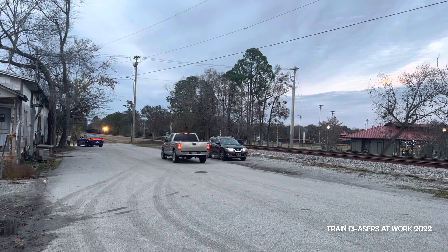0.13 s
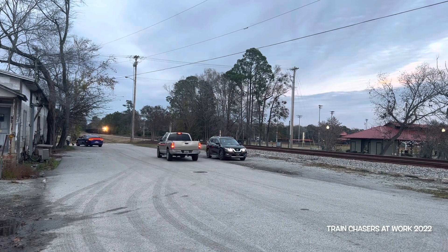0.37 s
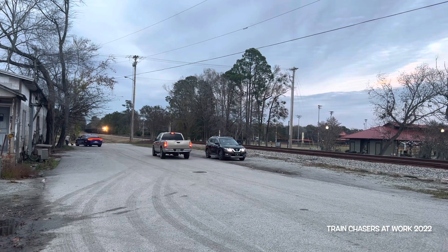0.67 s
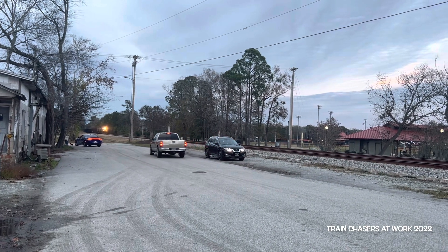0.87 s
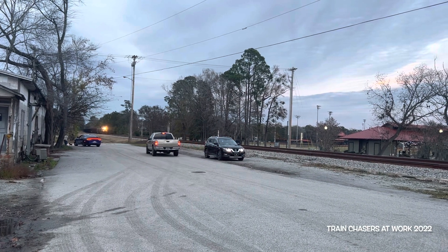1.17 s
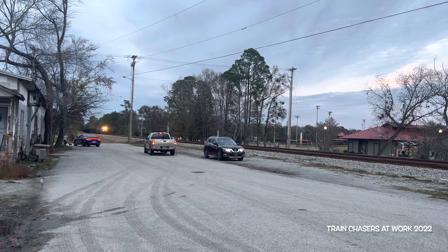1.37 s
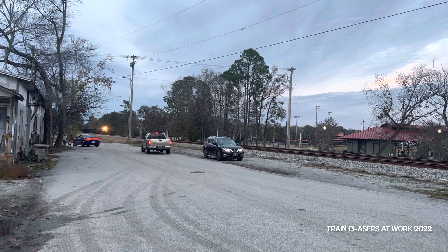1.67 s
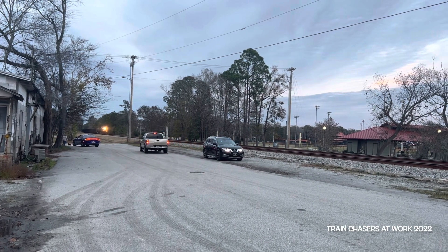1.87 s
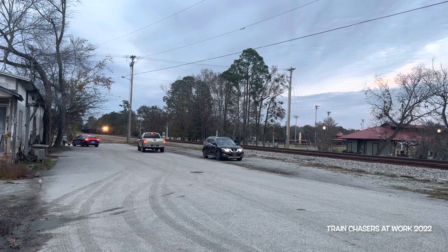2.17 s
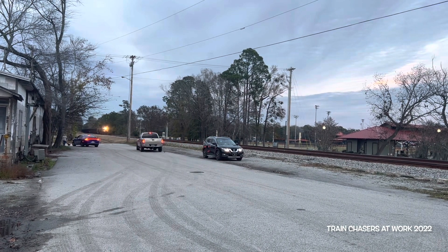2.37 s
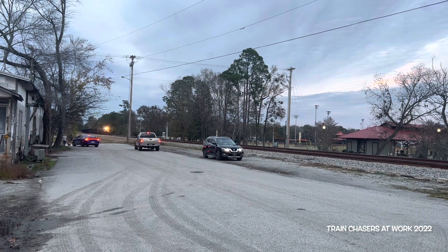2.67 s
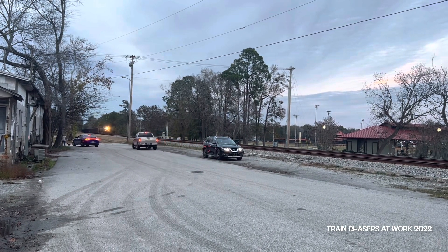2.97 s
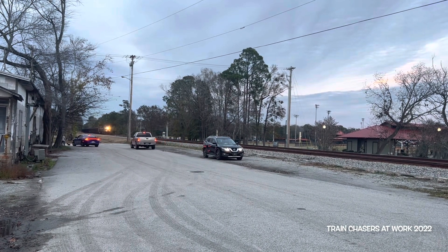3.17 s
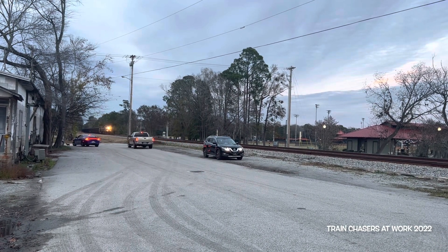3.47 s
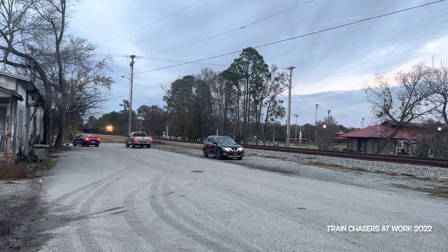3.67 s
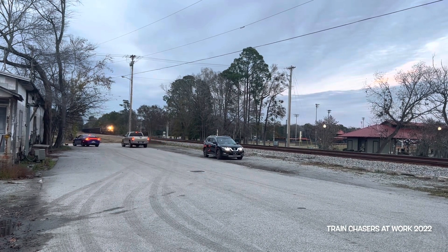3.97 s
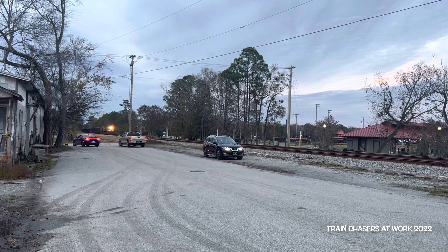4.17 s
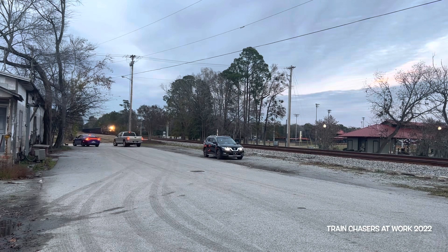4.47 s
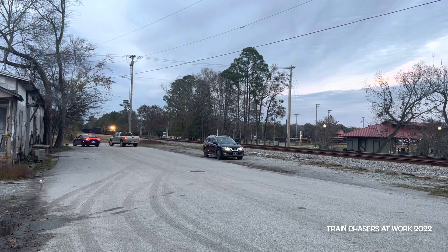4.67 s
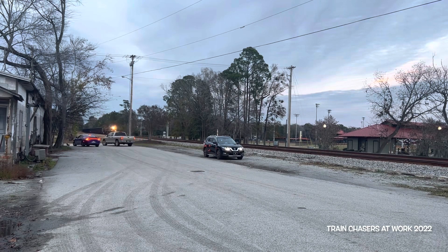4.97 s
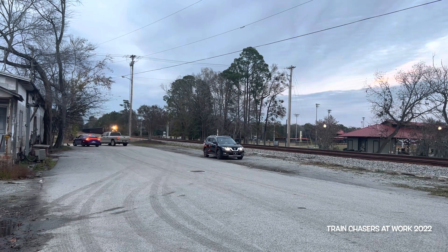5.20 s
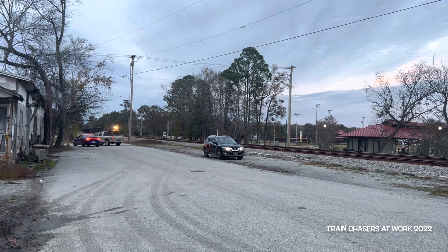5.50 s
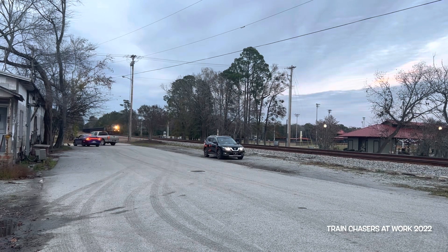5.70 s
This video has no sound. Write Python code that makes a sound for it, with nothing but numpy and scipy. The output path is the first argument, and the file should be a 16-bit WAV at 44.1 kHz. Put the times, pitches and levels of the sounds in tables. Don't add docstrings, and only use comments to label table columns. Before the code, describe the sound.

A train horn blows one long five-note chord at a distance, echoes flutter away, and a low diesel drone swells over rustle and grit ticks.

```python
import sys
import numpy as np
from scipy import signal
from scipy.io import wavfile
from scipy.ndimage import uniform_filter1d

SR = 44100
rng = np.random.default_rng(int(sys.argv[2]) if len(sys.argv) > 2 else 0)


def dump_mix(stems):
    frames = np.atleast_2d(stems).T
    limited = np.clip(frames, -1, 1)
    pcm = np.round(limited * 32767).astype(np.int16)
    wavfile.write(sys.argv[1], SR, pcm)


def ratio(d):
    e = np.asarray(d, float) / 20
    return 10 ** e


N = 257544
TIME = np.arange(N) / SR

# f/Hz, lead/rad
PORT_LEAD = [(70, .02), (100, .06), (190, .24), (430, .33), (800, .95), (1200, .65), (1800, 1.45),
             (2600, 2.2), (3500, 2.75), (4700, 4.2), (7500, 6.2), (9000, 5.6)]
# f/Hz, level/dB
PORT_LEAN = [(60, 0), (140, -2), (320, 0), (740, 0), (1130, 3), (2600, -0.5), (5000, 6), (9000, 0.5)]
# t/s, rumble level/dB
ENGINE_EFFORT = [(0, -29), (.6, -28.5), (1.5, -29.5), (2.1, -27), (2.7, -26), (3.3, -26.5), (3.9, -25.5),
                 (4.3, -25), (4.75, -25.5), (4.92, -25.5), (5.05, -22.5), (5.4, -22.5), (5.84, -21)]
ENGINE_MID_DB = -26
# speaks t/s, chokes t/s, how closely it follows line pressure [ratio]
SPEAKS = [
    (.203, 2.46, 0.7),
    (.205, 2.42, 0.86),
    (.203, 2.37, 1),
    (0.2, 2.41, 0.72),
    (0.18, 2.22, 2.4),
]
VALVE_OPENS_S = .2


def evened(x):
    return x / np.sqrt(np.mean(abs(x) ** 2) + 1e-20)


def read(points, hz):
    f, value = np.transpose(points)
    return np.interp(np.log(hz + 1), np.log(f + 1), value)


def curves(rows):
    s, *columns = np.transpose(rows)
    return [np.interp(TIME, s, c) for c in columns]


def drift(hz, size=64, count=N):
    r = np.exp(-2 * np.pi * hz * size / SR)
    steps = (N + SR) // size
    z = rng.standard_normal(steps) + 1j * rng.standard_normal(steps)
    for _ in range(2):
        z = signal.lfilter([1], [1, -r], z)
    z = z[SR // size - 2:]
    return np.interp(TIME[:count], np.arange(len(z)) * size / SR, evened(z))


def field(shape, bins, frames):
    parts = rng.standard_normal((2, *shape[::-1])).transpose(0, 2, 1)
    smooth = []
    for part in parts:
        across = uniform_filter1d(part, max(round(bins), 1), 0)
        smooth.append(uniform_filter1d(across, max(round(frames), 1), 1))
    return evened(smooth[0] + 1j * smooth[1])


def left_port(hz, lean):
    return ratio(read(lean, hz) / 2) * np.exp(.5j * read(PORT_LEAD, hz))


def at_ports(z, other, hz, size, shared=1):
    # f/Hz, coherence [0-1]
    port_same = [(60, .998), (140, .994), (300, .97), (520, .78), (900, .55), (1500, .4), (3000, .64),
                 (5500, .42), (8400, .92), (10000, .9)]
    same = np.clip(shared * read(port_same, hz), 0, 1)[:, None]
    half = left_port(hz, PORT_LEAN)[:, None]
    right = same * z + np.sqrt(1 - same ** 2) * other
    pair = np.array([z * half, right / half])
    return signal.istft(pair, nperseg=size, noverlap=size * 3 // 4)[1][:, :N]


def noise(colour, patchy_db, flicker_db, size):
    hz = np.fft.rfftfreq(size, 1 / SR)
    shape = (len(hz), 4 * N // size + 5)
    lumps_db = patchy_db * field(shape, 9, 9).real + flicker_db * rng.standard_normal(shape[1])
    gain = ratio(read(colour, hz)[:, None] + lumps_db)
    return evened(at_ports(gain * field(shape, 1, 1), gain * field(shape, 1, 1), hz, size))


def horn_air_db(speaks, chokes, follows):
    # t/s, level under full/dB
    pressure = [
        (.19, -13),
        (.206, -5.5),
        (.26, -4),
        (.36, -1),
        (.6, 0),
        (1.3, -0.5),
        (2.05, -1.5),
        (2.2, -1),
        (2.3, -5),
        (2.45, -14.5),
    ]
    speak_db_per_s, choke_db_per_s = 1500.5, 296.5
    gate_db = np.minimum(speak_db_per_s * (TIME - speaks), 0)
    gate_db -= choke_db_per_s * np.maximum(TIME - chokes, 0)
    follows = np.where(TIME < 1, min(follows, .8), follows)
    return follows * curves(pressure)[0], np.maximum(gate_db, -200)


def diesel():
    # f/Hz, share of rumble/dB, blur/Hz, wavering part [0-1]
    orders = [(69.3, -8, 4, .7), (96.5, -4.5, 5, .7), (138.6, -7, 3, .4), (173.2, -21, 2, .6),
              (207.9, -20, 3, .8), (233, -22, 3, .8), (46.2, -17, 3, .7), (250, -23, 3, .8),
              (287.5, -24, 3, .8), (325, -27, 3, .8)]
    # f/Hz, level/dB per Hz
    rumble_colour = [(12, -62.5), (24, -39.5), (34, -28.5), (46, -8), (70, -1.5), (100, -4.5), (120, 0),
                     (150, -9.5), (180, -36), (260, -59.5), (400, -120)]
    # f/Hz, level/dB per Hz
    roar_colour = [(90, -80), (130, -23), (170, -4.5), (240, -1.5), (300, -11), (360, -11.5), (420, -18),
                   (600, -38.5), (900, -51.5), (1500, -120)]
    orders_db, orders_db_per_s = -1.5, 0.1659
    roar_level_db, roar_follows = -35, 0.64
    rumble_db = curves(ENGINE_EFFORT)[0]
    out = ratio(-3) * noise(rumble_colour, 1.5, .5, size=2048)
    for hz, db, blur_hz, waver in orders:
        waver = np.clip(waver, 0, 1)
        wavering = np.sqrt(1 - waver ** 2) + waver * drift(blur_hz)
        line = np.sqrt(2) * np.exp(2j * np.pi * hz * TIME) * wavering
        half = left_port(hz, PORT_LEAN)
        lift_db = (orders_db + orders_db_per_s * TIME) * hz / orders[2][0]
        out += ratio(db + lift_db) * (line * np.array([[half], [1 / half]])).real
    roar_db = roar_level_db + roar_follows * (rumble_db - ENGINE_MID_DB)
    roar_db += 5 * np.exp(-TIME / .5)
    return ratio(rumble_db) * out + ratio(roar_db) * noise(roar_colour, 2.1, 0.35, size=1024)


def traffic():
    # f/Hz, level/dB per Hz
    hiss_colour = [(150, -63.5), (280, -11.5), (420, 0), (650, -2.5), (850, -5.5), (1100, -6.5),
                   (1400, -10.5), (2000, -11.5), (2450, -12.5), (2900, -13), (3400, -18), (4000, -26.5),
                   (6000, -53.5), (9000, -100)]
    # f/Hz, level/dB per Hz
    sizzle_colour = [(1500, -49.5), (3000, 2), (4000, 2.5), (5600, -3.5), (7000, -12.5), (8000, -18.5),
                     (10500, -33), (13000, -41.5), (16000, -71)]
    # f/Hz, level/dB per Hz
    truck_colour = [(290, -36.5), (500, -4.5), (591, -12), (627, -4.5), (708, 0), (1450, -5), (2140, -18.5),
                    (2270, -21), (3050, -24.5), (3960, -54.5), (6710, -120)]
    hum_db, wash_db, wash_lag_s = -44.5, -41.5, 0.19
    truck_db, truck_gone_s = -40, 0.39
    sizzle_start_db, sizzle_follows, sizzle_db_per_s = -63, .3, 0.76

    blowing = ratio(sum(horn_air_db(*SPEAKS[2]))) ** 2
    r = np.exp(-1 / (wash_lag_s * SR))
    power = ratio(2 * hum_db) + ratio(2 * wash_db) * signal.lfilter([1 - r], [1, -r], blowing)
    hum = np.sqrt(power) * noise(hiss_colour, 1.7, 0.91, size=512)

    effort_db = curves(ENGINE_EFFORT)[0] - ENGINE_MID_DB
    sizzle_db = sizzle_start_db + sizzle_db_per_s * TIME + sizzle_follows * effort_db
    sizzle = ratio(sizzle_db) * noise(sizzle_colour, 3.0, 0.99, size=512)

    leaving = ratio(truck_db) * np.exp(-.5 * TIME / truck_gone_s)
    return leaving * noise(truck_colour, 1.3, 0.83, size=512) + hum + sizzle


def rustle():
    # t/s, peak level/dB, dying time/s
    bursts = [(0, -70.5, 0.039), (.12, -69.5, 0.22), (.25, -66, 0.061), (.33, -72, 0.24), (.625, -67, 0.13),
              (1.255, -76.5, 0.28), (1.82, -70, 0.069), (2.055, -70.5, 0.094), (2.555, -75, 0.27),
              (2.925, -75, .05), (3.08, -86, .08), (3.25, -79, .08), (3.605, -75, 0.14), (3.8, -70, 0.78),
              (4.2, -71, 0.51), (4.7, -73.5, 0.37), (4.95, -70, .1), (5.1, -83, 0.41), (5.4, -75.5, 0.34),
              (5.65, -76.5, .4)]
    # f/Hz, level/dB per Hz
    cloth_colour = [(1500, -70), (3000, -28), (5000, -13), (6200, -10), (7400, -10), (8800, 0), (9800, -7),
                    (10800, -22), (12000, -28), (14000, -55)]
    floor_db, rise_s, fall_db = -87, .02, 11
    duck_db = -5.5
    level_db = floor_db + duck_db * ratio(sum(horn_air_db(*SPEAKS[0])))
    for s, peak_db, dies in bursts:
        away = np.maximum((s - TIME) / rise_s, (TIME - s) / max(dies, .01))
        level_db = np.maximum(level_db, peak_db - fall_db * away)
    crackle = ratio(2.6 * np.minimum(rng.exponential(1, N), 4))
    crackle = crackle * (rng.random(N) < 480 / SR)
    grain = .65 + evened(signal.lfilter([1], [1, -.985], crackle))
    return ratio(level_db) * evened(grain * noise(cloth_colour, 2.1, 1.6, size=256))


def strike(mix, s, peak_db, hz, width):
    t = np.arange(700) / SR
    scratch = .16 * rng.standard_normal((2, len(t))) * np.exp(-t / .002)
    click = np.arange(len(t)) == [[0], [2 * (hz < 7000)]]
    band = signal.butter(3, [hz - width / 2, hz + width / 2], "band", fs=SR, output="sos")
    ring = signal.sosfilt(band, scratch + click)
    mix[:, round(s * SR):][:, :len(t)] += ratio(peak_db) * ring / abs(ring.mean(0)).max()


def ticks():
    # t/s, peak level/dB, ring f/Hz, bright part under it/dB
    grit = [(.0842, -45, 4950, -18), (0.129, -53, 6030, -10), (0.1708, -53, 6000, 0),
            (0.204, -38, 4850, -14.5), (0.2402, -39, 4610, -11.5), (0.2546, -46, 3850, 0.5),
            (.3277, -43, 4980, -19.5), (0.3322, -56, 6040, 2), (0.368, -50.5, 5590, -8),
            (0.628, -57.5, 5900, -2), (.7193, -58, 6030, -1), (1.2411, -59, 5470, -2),
            (1.8162, -47, 6150, -13), (2.053, -35, 3300, -17), (2.5606, -58.5, 4800, 1),
            (2.7196, -48, 4500, -16), (2.9332, -48.5, 5800, -1.5), (3.0599, -39, 3260, -22),
            (3.2398, -34.5, 2700, -26), (3.2646, -55, 5980, -5), (3.615, -55, 6780, 4),
            (3.832, -61.5, 6000, 6), (3.8457, -48.5, 4940, -5), (3.9285, -45, 5420, -15),
            (4.0218, -43.5, 4900, -10), (4.11, -48, 5970, -10.5), (4.273, -44.5, 5120, -10),
            (4.9706, -57.5, 5500, -5.5), (5.2505, -53.5, 4930, -10), (5.4031, -54.5, 6020, -7.5)]
    # t/s, peak level/dB, top part under it/dB
    sparks = [(0.0573, -54, -29), (0.384, -61, -28.5), (0.622, -60, -31), (0.6444, -56.5, -33),
              (1.1488, -64.5, -29), (1.2524, -62.5, -13), (1.2585, -60, -17), (1.2685, -59.5, -24),
              (1.482, -63, -19), (1.4924, -69, -19), (1.8791, -59.5, -30), (2.9048, -63.5, -29),
              (3.236, -69, -19), (3.5783, -66, -29), (3.7569, -62, -33), (3.7898, -63, -31),
              (3.8243, -57, -41), (3.9644, -60, -51), (3.9747, -52, -46), (4.0944, -62, -39),
              (4.132, -60, -38), (4.3444, -61, -38), (4.5695, -60, -30), (4.6618, -60, -36),
              (5.2096, -67, -34), (5.5444, -63, -35)]
    # t/s, peak level/dB
    flecks = [(0.085, -76), (0.1705, -64.5), (0.2019, -73), (0.2385, -62), (0.3062, -77), (0.3311, -73),
              (0.367, -75.5), (0.618, -73.5), (1.1413, -83), (1.258, -69.5), (1.482, -75.5), (1.5055, -84),
              (1.7744, -77.5), (1.9979, -79), (2.053, -73.5), (2.0911, -77.5), (2.1246, -77), (2.5611, -76),
              (2.9342, -83), (3.0644, -84), (3.2645, -80), (3.6147, -79), (3.8591, -87), (3.926, -79),
              (4.0262, -79), (4.4877, -83), (4.6264, -89)]
    # t/s, peak level/dB, ring f/Hz
    knocks = [(.204, -32, 2000), (3.062, -44, 1690), (3.08, -31, 1100), (3.19, -38, 1500),
              (4.023, -36, 1600), (4.033, -34, 1210), (4.292, -36, 1150), (2.72, -34, 1100),
              (2.86, -36, 1300), (4.195, -41, 1100), (4.581, -46, 1370), (2.054, -34, 2200),
              (3.207, -33, 1000), (4.66, -47, 1150), (4.701, -45, 696), (4.714, -37, 1300),
              (4.74, -38, 1100)]
    # f/Hz, width/Hz
    bright = (8800, 1500)
    # f/Hz, width/Hz
    tick_top = (12800, 4500)
    # f/Hz, width/Hz
    spark_top = (11900, 1800)
    tick_top_db = -20.5
    out = np.zeros((2, N))
    for s, peak_db, hz, bright_db in grit:
        strike(out, s, peak_db, hz, .8 * hz)
        strike(out, s, peak_db + bright_db, *bright)
        strike(out, s, peak_db + bright_db + tick_top_db, *tick_top)
    for s, peak_db, top_db in sparks:
        strike(out, s, peak_db, *bright)
        strike(out, s, peak_db + top_db, *spark_top)
    for s, peak_db in flecks:
        strike(out, s, peak_db, *tick_top)
    for s, peak_db, hz in knocks:
        strike(out, s, peak_db, hz, 0.8 * hz)
    return out


def horn_turns(hz, sharp, bend):
    settles_s, valve_shuts_s, shutting_s = .13, 2.2, .2
    building = np.exp(-np.maximum(TIME - VALVE_OPENS_S, 0) / settles_s)
    closing = np.clip((TIME - valve_shuts_s) / shutting_s, 0, 1)
    pitch_hz = hz * (1 + sharp * building + bend * closing)
    return 2 * np.pi * (np.cumsum(pitch_hz) / SR + rng.random())


def shaken_air(hz, n):
    rough = (hz / 1000) ** 1.5
    each = np.array([drift(2 + hz / 300, count=n) for port in "LR"])
    shaken = 1 + min(.17 * rough, .75) * each + min(.13 * rough, .4) * drift(30, count=n)
    return shaken / np.sqrt(np.mean(abs(shaken) ** 2))


def chord():
    # steady f/Hz, sharp while pressure builds, bend as the valve shuts [shares of pitch]
    horns = [
        (323.9, .014, -.015),
        (379.3, .013, .01),
        (436.9, .017, .012),
        (506.8, .01, -.008),
        (633.6, .01, .004),
    ]
    heard_db = [(-26, -25, -32, -49, -57, -59, -63.5, -62, -74.5),
                (-25, -37.5, -44.5, -59.5, -49.5, -62.5, -71, -78.5, -79.5),
                (-20, -34.5, -45, -49, -58, -63.5, -72.5, -78.5, -81),
                (-28, -42.5, -54.5, -63, -62.5, -75, -79, -80.5, -88.5),
                (-23.5, -42.5, -53, -64, -64.5, -69.5, -75, -78, -95)]
    away_rows_db = [(-50, -45.5, -51.5, -61, -72.5, -61.5), (-52.5, -44.5, -53, -50.5, -52.5, -58.5),
                    (-50, -52, -56.5, -61, -79.5, -73.5), (-47, -46.5, -52, -54, -69.5, -69.5),
                    (-45.5, -67.5, -61, -63.5, -81, -76.5)]
    # f/Hz, level/dB
    horn_lean = [(60, -0.5), (91, -0.5), (140, -1.5), (210, -0.5), (320, 0.5), (490, -1.5), (740, -0.5),
                 (1130, 5.5), (1710, 0.5), (2600, 1)]
    rasp_top_hz, rasp_fall_db = 4850, 1.5
    brighten_opening, brighten_closing = 0.22, 0.49
    wander_db, wander_hz = 0.26, 6.4
    nearing_db_per_s = 1.5
    thrown_chokes_s, thrown_follows = 2.42, .8
    throw_follows, throw_dulls = 1.5, 0.4
    n = round(2.7 * SR)

    direct, thrown = np.zeros((2, N)), np.zeros(N)
    for horn, times, partials_db, thrown_db in zip(horns, SPEAKS, heard_db, away_rows_db):
        turns, pressure_db, gate_db = np.array([horn_turns(*horn), *horn_air_db(*times)])[:, :n]
        away_air = horn_air_db(times[0], thrown_chokes_s, thrown_follows)
        away_db, away_gate_db = np.array(away_air)[:, :n]
        above = np.arange(1, max(int(rasp_top_hz / horn[0]) - len(partials_db), 0) + 1)
        partials_db = (*partials_db, *(partials_db[-1] - rasp_fall_db * above))
        thrown_db = (*thrown_db, *(thrown_db[-1] - 3.1 * np.arange(1, len(partials_db))))
        brighten = np.where(TIME[:n] < 1, brighten_opening, brighten_closing)
        for k, (db, back_db) in enumerate(zip(partials_db, thrown_db), 1):
            hz = k * horn[0]
            level_db = db + (1 + brighten * (k - 1)) * pressure_db
            level_db += wander_db * np.sqrt(2) * drift(wander_hz, count=n).real
            level_db += nearing_db_per_s * hz / 1000 * (TIME[:n] - 1)
            tone = np.sqrt(2) * np.exp(1j * (k * turns + 2 * np.pi * rng.random()))
            half = left_port(hz, horn_lean)
            centre = 2 / max(abs(half + 1 / half + .2), .8)
            ports = tone * shaken_air(hz, n) * np.array([[half], [1 / half]])
            direct[:, :n] += (ratio(level_db + gate_db) * centre * ports).real
            thins = throw_follows * (1.5 + throw_dulls * (k - 3.5))
            thrown[:n] += ratio(back_db + thins * away_db + away_gate_db) * tone.real
    return direct, thrown


def echoes(thrown, size=2048):
    # pitch factor from the train's motion [ratio], delay t/s, level/dB
    trees = [(0.9317, .16, 2), (0.936, .33, -10), (0.9, .46, -13.5), (.931, .63, -6.5), (.937, .85, -9.5),
             (.932, 1.15, -10.5), (.94, 1.4, -12.5), (0.94, .55, -7.5), (0.98, .22, -8.5), (0.94, .12, -6),
             (0.95, 0.24, -13.5), (.964, .2, -14.5), (0.97, .4, -7.5), (0.98, .1, -12.5), (.99, .3, -4),
             (1, .42, -11)]
    near_trees_s, left_behind_db_per_s = .45, 1.5
    flutter_near, flutter_far = .25, .97
    far_from_s, far_by_s = 2.5, 2.8
    back = np.zeros(N)
    for factor, delay, db in trees:
        level_db = db - left_behind_db_per_s * (delay < near_trees_s) * (TIME - 1)
        left_train_s = VALVE_OPENS_S + (TIME - VALVE_OPENS_S - delay) * factor
        back += ratio(level_db) * np.interp(left_train_s, TIME, thrown)
    z = signal.stft(back, nperseg=size, noverlap=size * 3 // 4)[2]
    hz = np.fft.rfftfreq(size, 1 / SR)
    frame_s = np.arange(z.shape[1]) * size / 4 / SR
    loose = np.interp(frame_s, [far_from_s, far_by_s], [flutter_near, flutter_far])
    flutter = np.sqrt(1 - loose ** 2) + loose * field(z.shape, 1, 4)
    unshared = field(z.shape, 3, 6)
    return ratio(2.0) * at_ports(z * flutter, z * unshared, hz, size, shared=.75)


def street(direct):
    # delay t/s, level/dB
    walls = [
        (0.219, -29.5),
        (0.379, -24.5),
        (.55, -25),
        (.8, -30.5),
        (1.051, -31.5),
        (1.3, -33),
    ]
    tail_db, tail_t60_s, tail_delay_s = -13, 1.2, 0.041
    wall_bass = 0.88
    wall_treble, wall_treble_hz = 1.5, 600
    wall_right = -0.28
    t = np.arange(2 * SR) / SR
    taps = rng.standard_normal((2, len(t))) * ratio(-60 * t / tail_t60_s) * (t > tail_delay_s)
    middle = direct.mean(0)
    high = signal.butter(2, wall_treble_hz, "high", fs=SR, output="sos")
    clear = wall_bass * middle + wall_treble * signal.sosfilt(high, middle)
    tail = signal.fftconvolve(clear[None], taps / np.linalg.norm(taps[0]), axes=1)
    out = ratio(tail_db) * tail[:, :N]
    for delay, db in walls:
        late = ratio(db + 5.3 * drift(4.3).real) * np.interp(TIME - delay, TIME, clear, left=0)
        out += late * np.array([[1], [wall_right]])
    return out


def scene():
    around = diesel() + traffic() + rustle() + ticks()
    direct, thrown = chord()
    return around + direct + echoes(thrown) + street(direct)


def roll_off(x):
    return signal.sosfilt(signal.butter(12, 16000, fs=SR, output="sos"), x)


def record(dry):
    # f/Hz, level/dB
    circuit_tones = [(9464, -98.5), (9695, -100), (9738, -100)]
    # f/Hz, level/dB
    mic_dip = [(9800, 0), (10050, -24), (10500, -17.5), (11000, 1.5)]
    mic_low_hz, mic_hiss_db = 35.2, -90
    whine = np.zeros(N)
    for tone_hz, db in circuit_tones:
        tone = np.sqrt(2) * np.sin(2 * np.pi * (tone_hz * TIME + rng.random()))
        whine += ratio(db) * tone * abs(1 + 0.28 * drift(3))
    bass_cut = signal.butter(2, mic_low_hz, "high", fs=SR, output="sos")
    heard = signal.sosfilt(bass_cut, dry + ratio(mic_hiss_db) * rng.standard_normal(N))
    hz = np.linspace(0, SR / 2, 513)
    dip = signal.firwin2(511, hz, ratio(read(mic_dip, hz)), fs=SR)
    heard = signal.oaconvolve(heard + whine, dip[None], "same")
    heard = heard * np.minimum(TIME / .004, 1)
    return roll_off(heard)


dry = scene()
out = record(dry)
dump_mix(out)
```